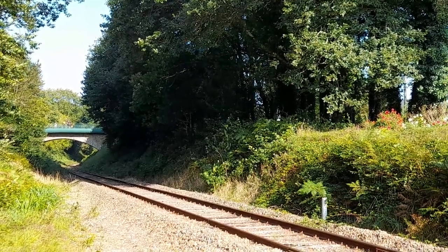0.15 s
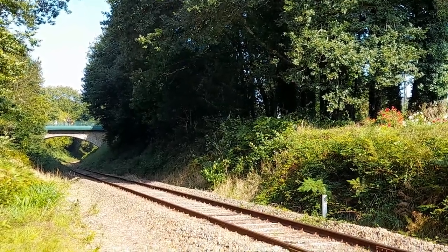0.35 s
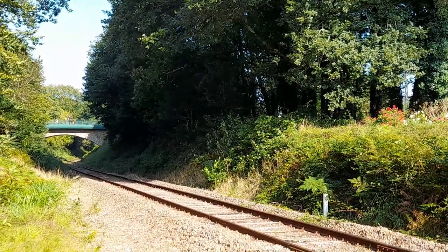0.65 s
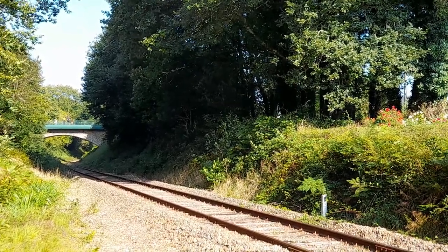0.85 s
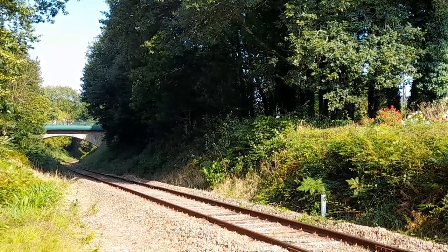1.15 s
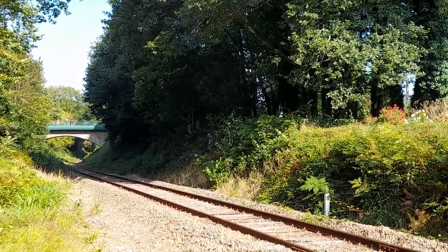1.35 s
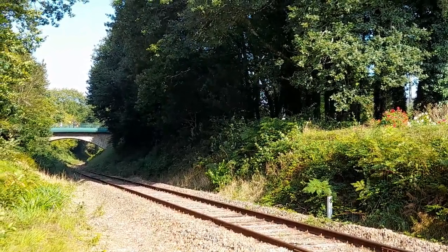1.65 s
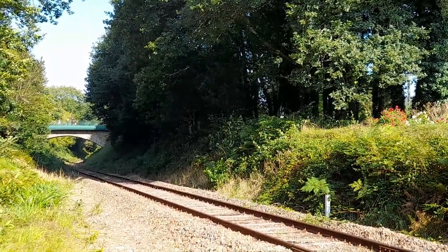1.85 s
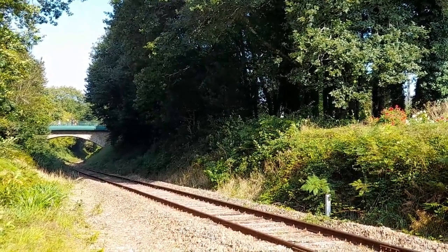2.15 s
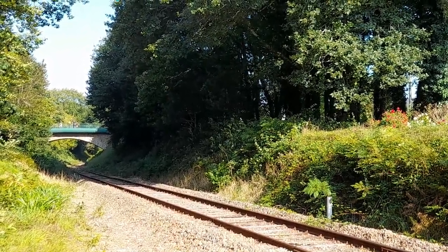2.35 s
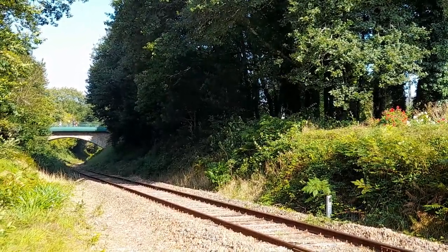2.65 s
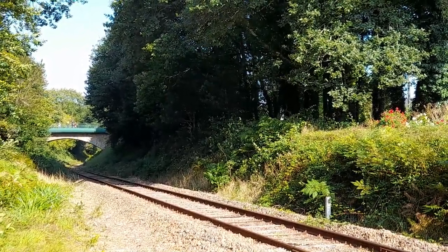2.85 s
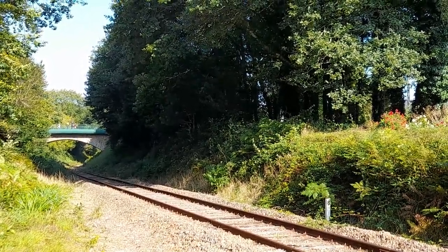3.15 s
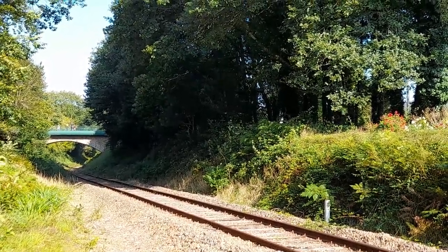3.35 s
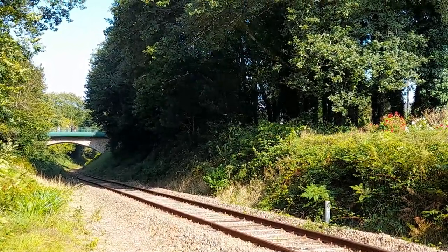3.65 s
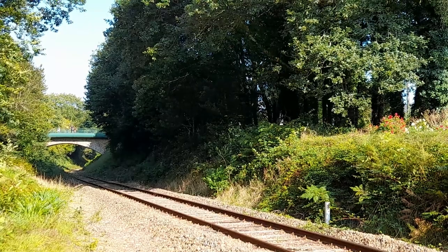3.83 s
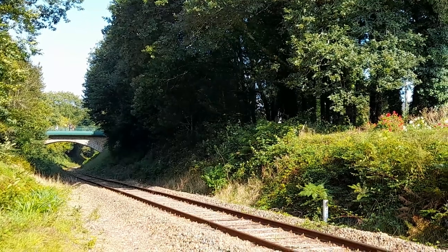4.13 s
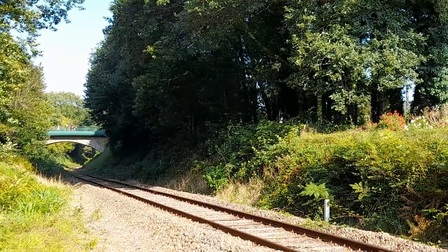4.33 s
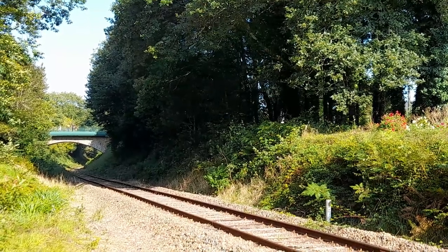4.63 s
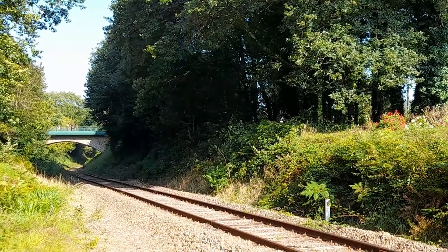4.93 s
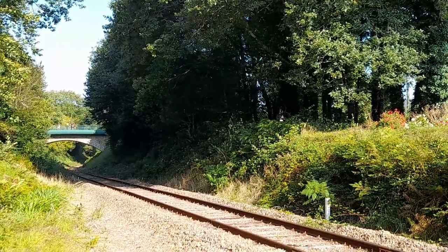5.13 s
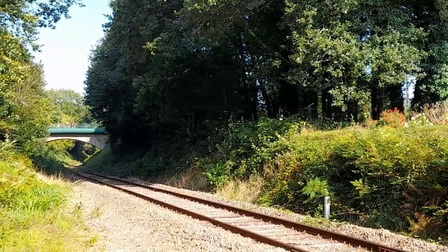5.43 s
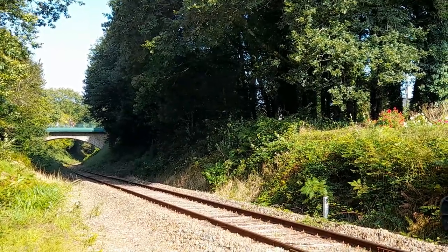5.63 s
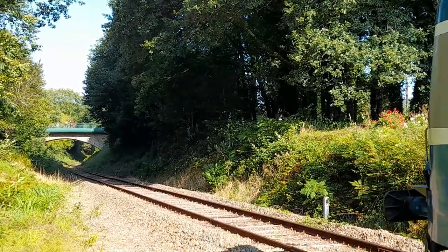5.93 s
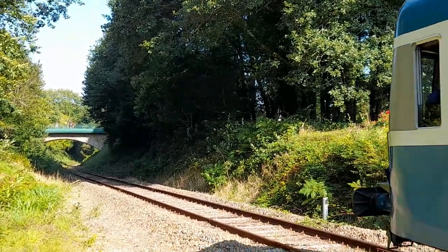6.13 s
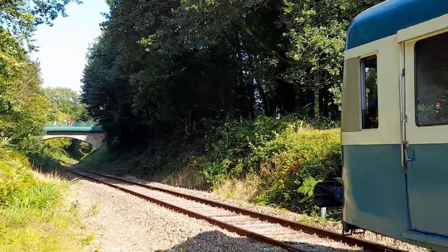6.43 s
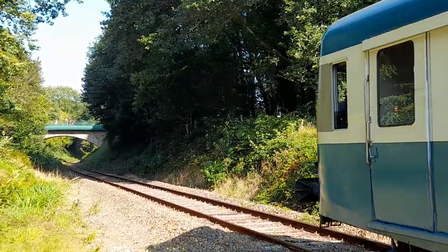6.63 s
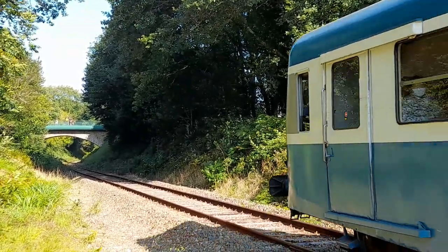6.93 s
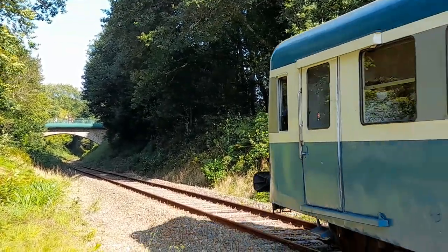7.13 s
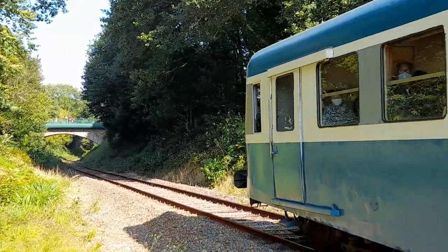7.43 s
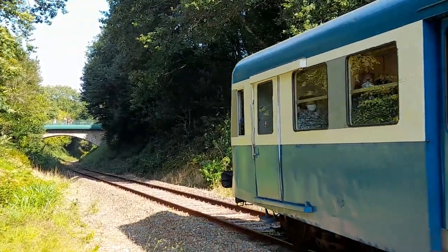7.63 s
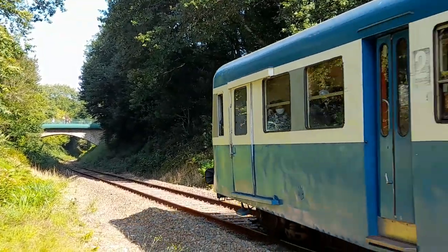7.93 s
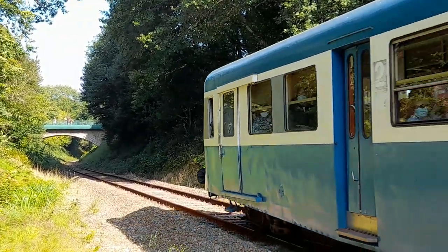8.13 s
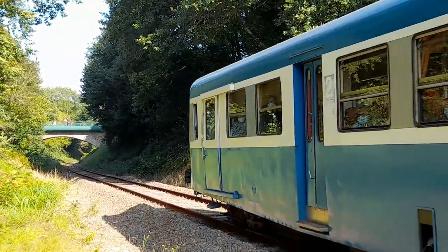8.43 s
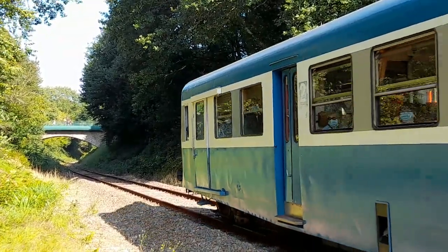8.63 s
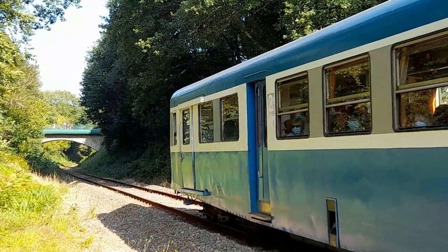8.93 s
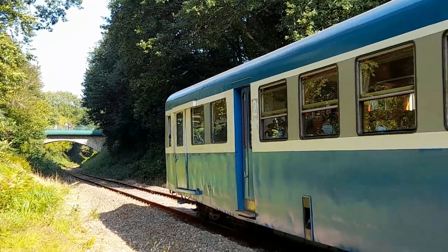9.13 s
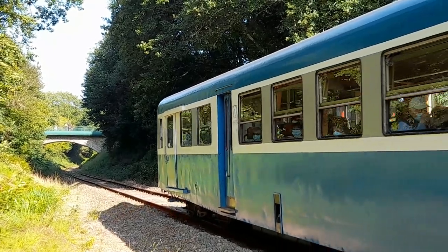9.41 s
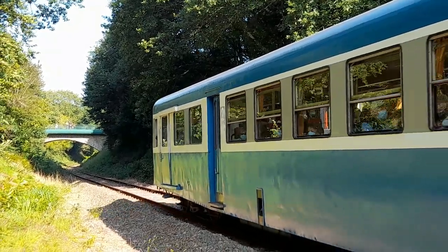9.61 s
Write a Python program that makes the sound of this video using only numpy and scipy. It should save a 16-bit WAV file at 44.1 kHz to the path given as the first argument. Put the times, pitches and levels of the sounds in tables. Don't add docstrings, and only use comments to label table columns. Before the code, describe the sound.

A diesel railcar idles with a lumpy drone, revs up at four seconds, then rumbles past ever louder with whistling turbo and singing wheels in a light breeze.

```python
import sys
import numpy as np
from scipy import signal
from scipy.io import wavfile
from scipy.ndimage import uniform_filter1d, map_coordinates

SR = 44100
rng = np.random.default_rng(int(sys.argv[2]) if len(sys.argv) > 2 else 0)


def store_wav(level_fs):
    pcm = np.round(np.clip(np.atleast_2d(level_fs), -1, 1) * 32767)
    wavfile.write(sys.argv[1], SR, pcm.T.astype(np.int16))


def boost_factor(decibels):
    exponent = np.asarray(decibels, float) / 20
    return 10 ** exponent


N = 430857
SIDES = np.array([[.5], [-.5]])


def rms_one(x):
    return x / np.sqrt(np.mean(x ** 2) + 1e-20)


def curve(points):
    t, value = np.transpose(points)
    return np.interp(np.arange(N) / SR, t, value)


def at_hz(points, hz):
    f, value = np.transpose(points)
    return np.interp(np.log(hz), np.log(np.maximum(f, 1)), value)


def swells(rows):
    t = np.arange(0, N, 40) / SR
    db = sum(peak_db * np.exp(-((t - s) / half) ** 2) for s, half, peak_db in rows)
    return np.repeat(db, 40)[:N]


def flicker(rate, spread_db):
    r = np.exp(-80 * np.pi * rate / SR)
    coarse = rng.standard_normal(N // 40 + 2002)
    slow = signal.lfilter([1], [1, -2 * r, r * r], coarse)[2000:]
    return np.repeat(boost_factor(spread_db * rms_one(slow)), 40)[:N]


def lowpass(x, order, hz):
    return signal.sosfilt(signal.butter(order, hz, fs=SR, output="sos"), x)


def bandpass(x, low_hz, high_hz):
    return signal.sosfilt(signal.butter(2, [low_hz, high_hz], "band", fs=SR, output="sos"), x)


def resonate(x, hz, width_hz):
    r = np.exp(-np.pi * width_hz / SR)
    feedback = [1, -2 * r * np.cos(2 * np.pi * hz / SR), r * r]
    return signal.lfilter(np.array([1, 0, -1]) * (1 - r * r) / 2, feedback, x + 1e-18)


def ring(clicks, hz, t60):
    r, w = boost_factor(-60 / (t60 * SR)), 2 * np.pi * hz / SR
    return signal.lfilter([0, np.sin(w)], [1, -2 * r * np.cos(w), r * r], clicks + 1e-18)


def banded_noise(spectrum, patchy_db):
    # f/Hz, share [0..1]
    likeness = [(30, .7), (100, .85), (500, .85), (1200, .85), (2500, .6), (5000, .3), (12000, .3)]
    # f/Hz, left minus right level/dB
    tilt = [(60, 3), (110, 2), (200, 0.5), (380, 3), (700, 0), (1290, -3), (2380, -1), (4400, 2),
            (8120, -2.5), (15000, 1)]
    low_hz, top_hz = spectrum[1][0] / 1.25, min(spectrum[-2][0] * 1.15, 17000)
    edges = np.geomspace(low_hz, top_hz, int(3 * np.log2(top_hz / low_hz)) + 2)
    white = rng.standard_normal((2, 2, N))
    out = np.zeros((2, N))
    for k, (low, high) in enumerate(zip(edges, edges[1:])):
        hz = np.sqrt(low * high)
        alike = np.clip(at_hz(likeness, hz), 0, 1)
        side_gain = boost_factor(at_hz(spectrum, hz) + at_hz(tilt, hz) * SIDES)
        mix = side_gain * np.sqrt([1 + alike, 1 - alike]) * [[1, 1], [1, -1.62]]
        out += flicker(17.0, patchy_db) * (mix @ bandpass(white[k % 2], low, high))
    return rms_one(out * flicker(12.0, 0.4 * patchy_db))


def surge():
    # starts, full, holds until, gone [t/s]
    surge_times = (4.0, 4.14, 4.33, 4.42)
    return np.interp(np.arange(N) / SR, surge_times, [0, 1, 1, 0])


def layer_db(name):
    # t/s, level/dB
    effort = [(0, -54.5), (.7, -55), (1.4, -51.5), (2.3, -50.5), (2.6, -53.5), (3.2, -51.5), (3.95, -51),
              (4.45, -49), (5.6, -48), (6.1, -46.5), (7.3, -48), (8.4, -46), (9.4, -48.5), (9.77, -46.5)]
    layers = {"exhaust": (-38.3, .5, .3, 6.), "clatter": (-54.5, 1, 0, 5.5), "hiss": (-68.5, .8, -.15, 3.5),
              "rumble": (-40, .15, 1.12, -.5), "whistle": (-64, .6, .75, 7.), "octave": (-84, .6, 1.05, 7.)}
    start_db, share, rise_db, surge_db = layers[name]
    effort_db = curve(effort)
    follow_db = share * (effort_db - effort_db[0])
    return start_db + follow_db + rise_db * np.arange(N) / SR + surge_db * surge()


def crankshaft():
    # t/s, f/Hz
    speed_points = [
        (0, 7.2595),
        (4.0, 7.261),
        (4.355, 8.49),
        (5, 8.481),
        (7.6, 8.4815),
        (9.77, 8.461),
    ]
    speed = curve(speed_points)
    cycle = .027 + np.cumsum(speed) / SR
    load = np.clip((speed - speed[0]) / 1.2, 0, 1)
    return cycle, load


def exhaust(cycle, load):
    # arrival [twelfths of a cycle], coasting level/dB, loaded level/dB
    cylinders = [(0., 0, -2), (1.1, -9, -10), (1.93, -11, -9), (2.9, -10, -11), (4.085, -2, -2),
                 (5.07, -9, 0), (5.9, -11, -5), (6.8, -16, -13), (8.17, -9, -1), (9.17, -12, -7),
                 (10.2, -14, -15), (10.9, -16, -10)]
    # f/Hz, width/Hz, coasting level/dB, loaded level/dB
    pipes = [(138, 45, -19., -20), (266, 28., -8., -1), (292, 34., -3, -2.5), (400, 100., -4., -5.5),
             (387, 40., -5., -4.5), (422, 32, -12, -1), (490., 28, -7.5, -16.5), (660, 170, -16.5, -12)]
    # t/s, half length/s, level/dB
    turning_away = [(9.6, 1.9, -6.5)]
    scatter_db, jitter = 1.5, 5.
    place, coast_db, load_db = np.transpose(cylinders)
    turns = np.arange(int(cycle[-1]) + 1)[:, None] + place / 12
    chance = rng.standard_normal((2,) + turns.shape)
    at = np.interp(turns, cycle, np.arange(N)) + jitter * chance[0]
    at = np.clip(at, 0, N - 1).astype(int)
    pulses = np.zeros(N)
    pulses[at] = boost_factor(coast_db + load[at] * (load_db - coast_db) + scatter_db * chance[1])
    pulses[[0, -1]] = 0
    pulses = lowpass(pulses + 1e-18, 3, 800.)
    out = np.zeros(N)
    for hz, width_hz, pipe_coast_db, pipe_load_db in pipes:
        tone = resonate(resonate(pulses, hz, width_hz), hz, 2 * width_hz)
        out += boost_factor(pipe_coast_db + load * (pipe_load_db - pipe_coast_db)) * rms_one(tone)
    steady = out / np.sqrt(uniform_filter1d(out ** 2, size=30000))
    return boost_factor(layer_db("exhaust") + swells(turning_away)) * steady


def crank_tones(cycle, load):
    # t/s, rms level/dB
    drone_level = [(0, -46), (1.1, -43), (1.4, -36.5), (2.0, -40), (2.31, -31), (2.58, -38), (3.15, -32),
                   (4.0, -35), (4.5, -33), (5.0, -31), (5.5, -29.5), (6.6, -33), (6.95, -26.5), (7.15, -28),
                   (8.1, -29), (8.45, -27.5), (9.09, -20.5), (9.77, -19)]
    tone_settings = {"drone": (0, -.5, 10.5, 1.3), "fan": (-52, -43, -8., 2.5),
                     "fan 2": (-54, -44, 10., 2.), "fan 3": (-51, -52, 6., 2.), "boom": (-53, -51, 6., 1.5),
                     "gear": (-63, -56, -3., .8), "eighth": (-52, -47, 4., 2.), "ninth": (-50, -47, 5., 2.)}
    # t/s, half length/s, level/dB
    CANCELLING = [(3.76, .04, -9), (4.41, .04, -9), (5.25, .12, -9), (6.7, .07, -9), (8.3, .08, -19)]
    facing = {"drone": CANCELLING, "fan": [(6.3, .9, 7.), (8.3, 1.1, 13.5)], "fan 2": [(5.9, .5, 6.),
              (8.15, .8, 10.)], "fan 3": [(7.0, .6, 7.), (8.6, .9, 11.), (9.7, .22, 16.)],
              "boom": [(6.0, .9, 11.), (9.4, .9, 19.)], "gear": [(7.2, .8, 7.), (9.0, .5, 8.)],
              "eighth": [(5.8, .8, 3.), (9.8, 1.5, -8.)], "ninth": [(7.3, 1.1, 7.), (9.8, 1.1, -8.)]}
    fan = 22.24
    orders = [12, fan, 2 * fan, 3 * fan, 34, 102.1, 8, 9]
    out = 0
    for order, (name, (coast_db, load_db, surge_db, unsteady_db)) in zip(orders, tone_settings.items()):
        db = coast_db + load * (load_db - coast_db) + surge_db * surge() + swells(facing[name])
        if name == "drone":
            db = db + curve(drone_level)
        sine = np.sqrt(2) * np.sin(2 * np.pi * order * cycle)
        out = out + boost_factor(db) * flicker(11.0, unsteady_db) * sine
    return out


def turbo():
    # t/s, f/Hz
    pitch = [(0.0, 4950), (2.23, 4950), (2.58, 5070), (4.0, 5050), (4.26, 5260), (4.79, 5530), (5.22, 5610),
             (7.45, 6010), (8.6, 6160), (9.77, 6270)]
    # t/s, half length/s, level/dB
    whistle_flare = [(2.4, .12, 5.), (4.8, .25, -3.)]
    # t/s, half length/s, level/dB
    octave_flare = [(5.9, .5, 3.), (9.1, .45, 4.)]
    flare_db = swells(whistle_flare)
    whistle_db = layer_db("whistle") + flare_db
    octave_db = layer_db("octave") + flare_db + swells(octave_flare)
    phase = 2 * np.pi * np.cumsum(curve(pitch)) / SR
    out = 0
    for k, db, width_hz in [(1, whistle_db, 135.), (2, octave_db, 400.)]:
        wobble = lowpass(rng.standard_normal((2, 3, N)), 2, width_hz)
        band = wobble[0] * np.cos(k * phase) + wobble[1] * np.sin(k * phase)
        out = out + boost_factor(db) * rms_one(band[0] + 2.4 * band[1:])
    return out


def rumble():
    # f/Hz, level/dB per Hz
    colour = [(15, -55), (25, -33.5), (86, -1.5), (109, 0), (199, -17), (260, -6.5), (325, -7),
              (387, -10.5), (566, -17), (642, -13.5), (1100, -32), (1430, -60), (2420, -120)]
    return boost_factor(layer_db("rumble")) * banded_noise(colour, patchy_db=0.5)


def clatter():
    # f/Hz, level/dB per Hz
    colour = [(530, -40.5), (900, -25), (1050, -3), (1350, -3.5), (2050, -2.5), (3590, -12), (3990, -10),
              (5030, -13), (5800, -14.5), (6620, -18), (7500, -59), (9750, -74), (16500, -120)]
    return boost_factor(layer_db("clatter")) * lowpass(banded_noise(colour, patchy_db=1.97), 6, 6800.)


def hiss():
    # f/Hz, level/dB per Hz
    colour = [(4000, -40), (6800, -12), (7370, 3), (8130, -2), (9070, 5.5), (11500, 10), (14400, 7.5),
              (16300, 1)]
    # t/s, half length/s, level/dB
    hiss_flare = [(3.5, .7, 1.8), (9.5, .45, 1.8)]
    return boost_factor(layer_db("hiss") + swells(hiss_flare)) * banded_noise(colour, patchy_db=0.7)


def wind():
    # t/s, half length/s, level/dB
    breeze = [
        (1.36, .2, 11.),
        (2.0, .15, -5.),
        (2.4, .35, 7.),
        (3.8, .4, -5.),
        (4.95, .22, 8.),
        (6.8, 1.5, 4.),
    ]
    # t/s, peak level/dB, left minus right level/dB, length/s
    gusts = [(0.35, -22.5, 1, 0.053), (0.431, -24, 5, 0.045), (0.518, -32, -9, 0.05),
             (0.776, -21.5, 4, 0.022), (0.83, -36, -2.0, 0.038), (1.127, -26.5, 12, 0.03),
             (1.169, -27, -5, 0.019), (1.279, -26, 2, 0.018), (1.342, -31, -3, 0.027),
             (1.566, -28.5, -8, 0.028), (1.928, -27, 26, 0.022), (2.039, -26, 6, 0.042),
             (2.283, -24, 10, 0.022), (2.799, -33, -13, 0.03), (3, -30, -12, 0.018)]
    noise = rng.standard_normal((3, N)) * [flicker(13.0, 1.9) for _ in range(3)]
    lumpy = bandpass(1.2 * noise[0] + noise[1:], 40., 90.)
    out = boost_factor(-44 + swells(breeze)) * rms_one(lumpy)
    age = np.arange(8000) / SR
    for s, db, pan_db, length in gusts:
        puff = bandpass(rng.standard_normal((3, len(age))), 55., 160.)
        puff = rms_one(puff[0] + 0.83 * puff[1:])
        shape = age / length * np.exp(1 - age / length * 2)
        out[:, round(s * SR):][:, :len(age)] += boost_factor(db + 1.2 + SIDES * pan_db) * shape * puff
    return out


def knocks():
    # t/s, peak level/dB, f/Hz, t60/s
    knock_events = [(.875, -52, 2270, .02), (.892, -47, 3800, 0.11), (.895, -48, 1800., .04),
                    (.9, -52, 3000., .04), (1.93, -43, 990, 0.12), (7.724, -37.5, 1880, 0.14),
                    (7.731, -43.5, 2500., 0.12), (7.7, -33, 850, .16), (7.74, -45, 1300., 0.097),
                    (7.73, -46, 3700., .08), (7.843, -40.5, 1820, .08), (7.885, -58.5, 9600., .05),
                    (4.1, -40., 2130, 0.11), (4.25, -42., 2030, .1)]
    out = np.zeros(N)
    age = np.arange(int(.15 * SR)) / SR
    for s, db, hz, t60 in knock_events:
        burst = resonate(rng.standard_normal(len(age)), hz, 25. / t60 ** .5)
        burst = rms_one(resonate(burst, hz, 600.))
        out[round(s * SR):][:len(age)] += boost_factor(db + 1.5 - 60 * age / t60) * burst
    return out


def clinks():
    # t/s, peak level/dB
    clink_events = [
        (2.2997, -43),
        (2.3114, -43),
        (2.348, -39),
        (2.378, -41),
        (2.394, -47),
    ]
    # from t/s, to t/s, touches per s, level/dB
    rattle = (2.325, 2.43, 600, -50.5)
    # f/Hz, width/Hz, level/dB
    steel = [(4720, 65, 2), (5000, 65, 2), (5430, 57, -9), (7180, 110, -11), (9420, 86, -17),
             (10400, 66, -23), (11300, 170, -11), (12500, 37, -19), (12900, 46, -23), (13700, 79, -18),
             (14900, 60, -22)]
    clink_s, clink_db = np.transpose(clink_events)
    at = np.round(clink_s * SR).astype(int)
    start, end, per_s, rattle_db = rattle
    span = slice(round(start * SR), round(end * SR))
    count = span.stop - span.start
    heard = slice(2 * SR, 3 * SR)
    out = np.zeros(N)
    for hz, width_hz, level_db in steel:
        clicks = np.zeros(N)
        touches = rng.random(count) < per_s / SR
        clicks[span] = boost_factor(rattle_db) * rng.standard_normal(count) * touches
        clicks[at] = boost_factor(clink_db - 3 + rng.normal(0, 2, len(at)))
        softened = resonate(clicks[heard], hz, 900.)
        out[heard] += boost_factor(level_db) * ring(softened, hz, 2.2 / width_hz)
    return out


def wheels():
    # t/s,
    # length/s, f/Hz, width/Hz, level/dB
    singing = [
        (3.9, .9, 1790, 400., -51),
        (5.4, 1.3, 4070., 120., -60.),
        (7.6, 0.73, 3000., 500., -61),
        (8.5, .5, 2130, 400., -56.5),
        (9.007, 1.4, 1236, 443, -45.5),
        (7.8, 1.32, 165, 70.5, -41),
        (4.2, .13, 283, 30., -31),
        (7.9, 1.3, 225, 60., -41),
        (3.0, 1.9, 7750, 900., -75),
    ]
    out = np.zeros(N)
    for s, length, hz, width_hz, db in singing:
        heard = slice(max(0, round((s - 2 * length) * SR)), round((s + 2 * length) * SR))
        t = np.arange(N)[heard] / SR
        swell = np.exp(-((t - s) / length) ** 2) * flicker(9.4, 2.8)[heard]
        noise = resonate(rng.standard_normal(len(t)), hz, width_hz)
        out[heard] += boost_factor(db) * swell * rms_one(resonate(noise, hz, width_hz))
    return out


def cutting(x):
    out = np.zeros((2, N))
    lags = (rng.uniform(0.00809, .09, 10) * SR).astype(int)
    for k, lag in enumerate(lags):
        out[k % 2, lag:] += x[:-lag] * boost_factor(-110. * lag / SR) * (-1) ** (k // 2)
    return lowpass(out, 1, 1500.)


def spaced_microphones(train):
    # t/s, delay [samples]
    left_lag = [(0, 12.55), (5.5, 14.1), (7.5, 14.9), (9.77, 21.7)]
    heard_at = np.arange(N) - curve(left_lag)
    left = map_coordinates(train[0], [heard_at], order=3, prefilter=True, mode="nearest")
    return np.array([left, train[1]])


def thin_out(x):
    # f/Hz, level/dB relative to the local mean
    dropped = [(1000, -30), (1600, -8), (6300, -10), (7200, -1.6), (9000, -1.2), (11500, -1.8),
               (16000, -.5)]
    hz, _, z = signal.stft(x, SR, nperseg=2048)
    power = uniform_filter1d(uniform_filter1d(abs(z) ** 2, size=5, axis=1), size=2, axis=2)
    around = uniform_filter1d(uniform_filter1d(power, size=24, axis=1), size=2, axis=2)
    threshold = boost_factor(2 * at_hz(dropped, np.maximum(hz, 1)))[:, None]
    kept = power > around * threshold
    return signal.istft(z * kept, SR, nperseg=2048)[1][:, :N]


def scene():
    cycle, load = crankshaft()
    near = exhaust(cycle, load) + knocks() + clinks() + wheels()
    train = near * boost_factor([[-.4], [.4]]) + boost_factor(-18.5) * cutting(near)
    train = train + crank_tones(cycle, load) + turbo()
    train = train + rumble() + clatter() + hiss()
    return spaced_microphones(train) + wind()


def roll_off(x):
    return signal.sosfilt(signal.butter(12, 16540, fs=SR, output="sos"), x)


def record(dry):
    x = signal.sosfilt(signal.butter(2, 30., "high", fs=SR, output="sos"), dry)
    swap = np.array([[1, 1], [1, -1.04]]) / np.sqrt(2)
    mix = swap @ thin_out(swap @ x)
    return roll_off(mix)


dry = scene()
out = record(dry)
store_wav(out)
```